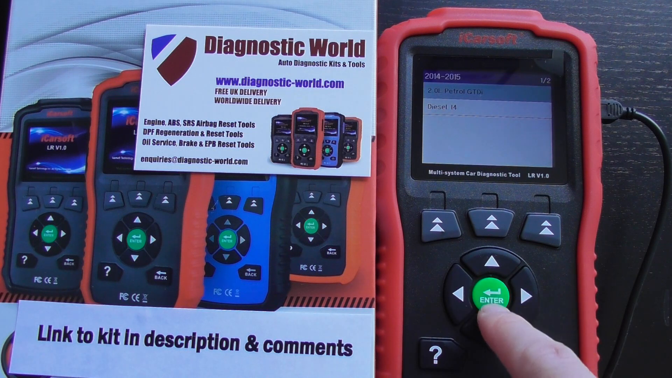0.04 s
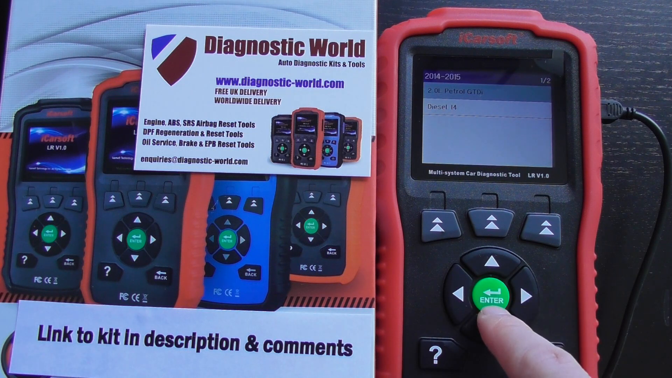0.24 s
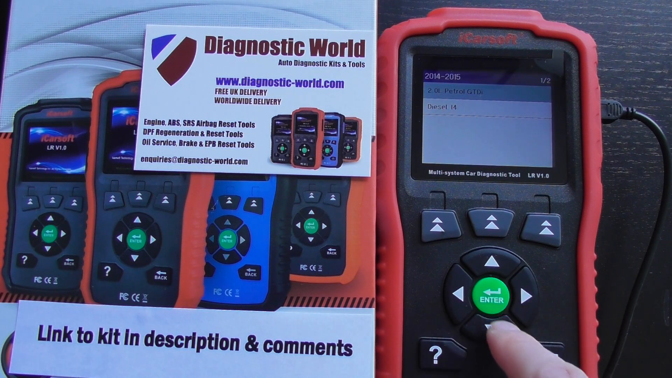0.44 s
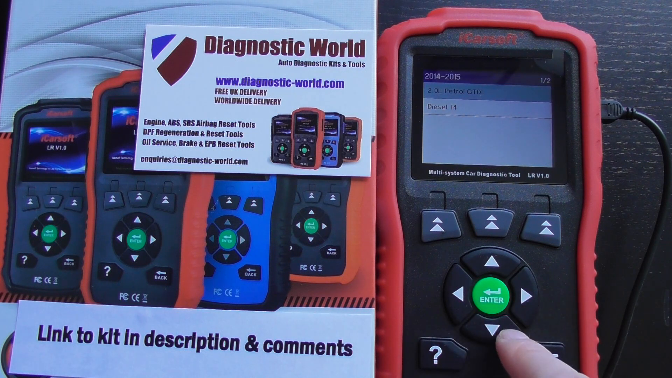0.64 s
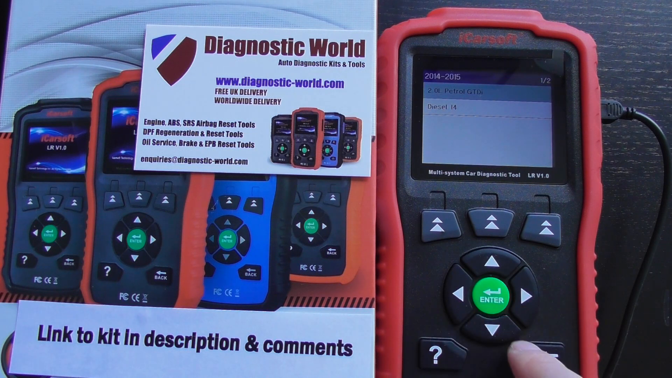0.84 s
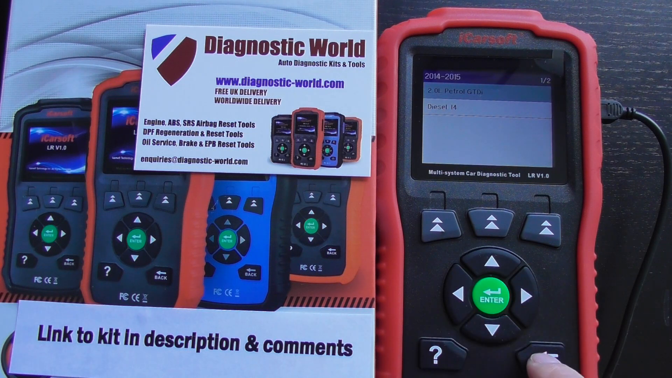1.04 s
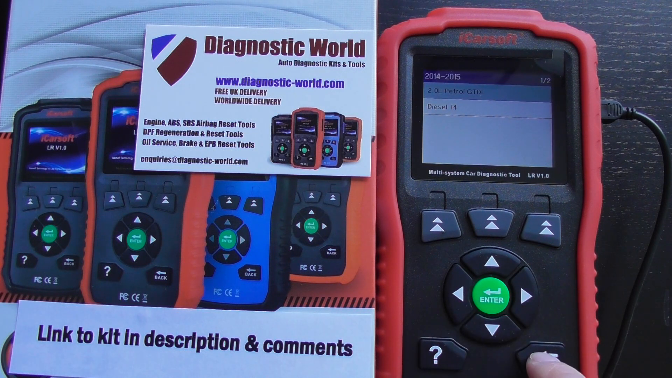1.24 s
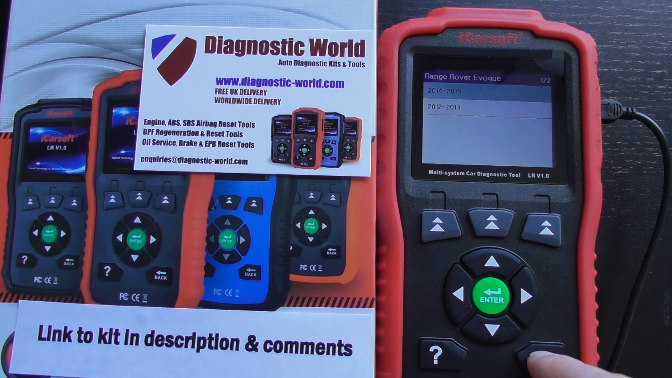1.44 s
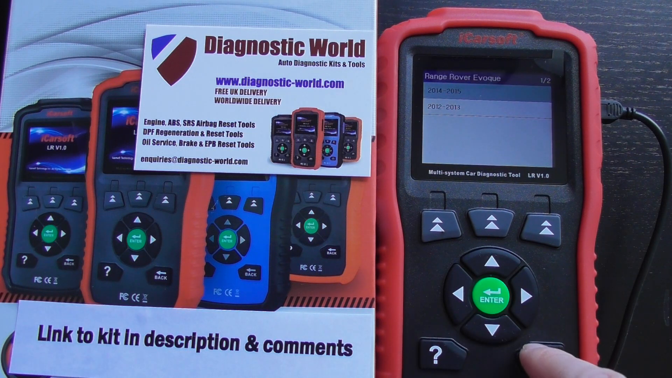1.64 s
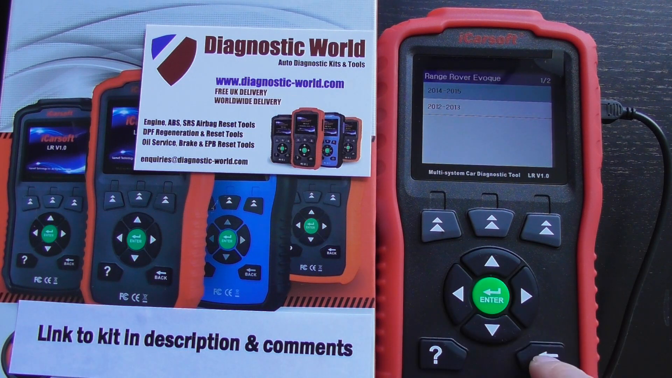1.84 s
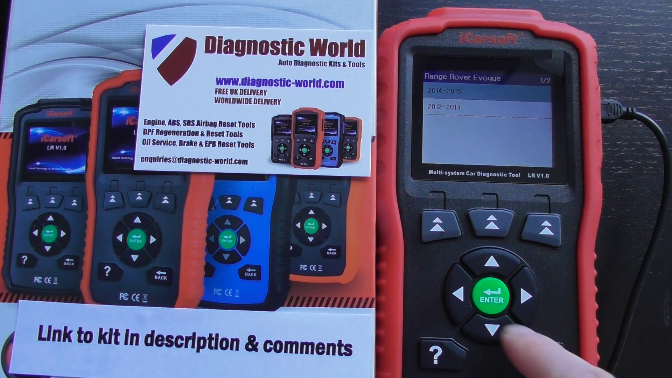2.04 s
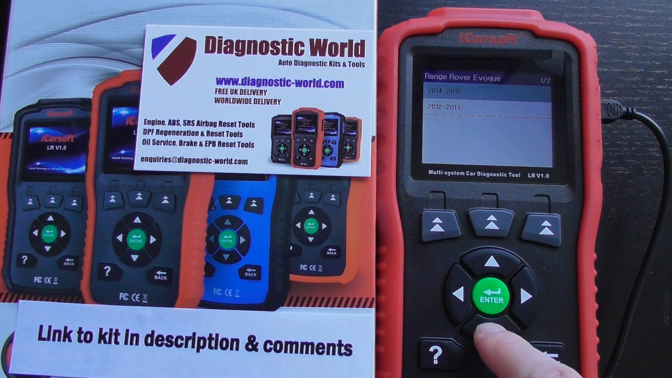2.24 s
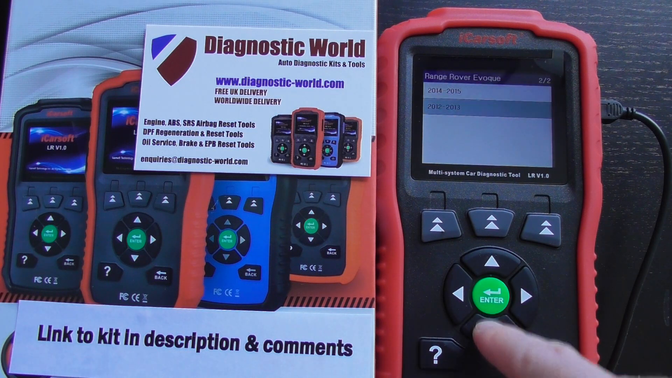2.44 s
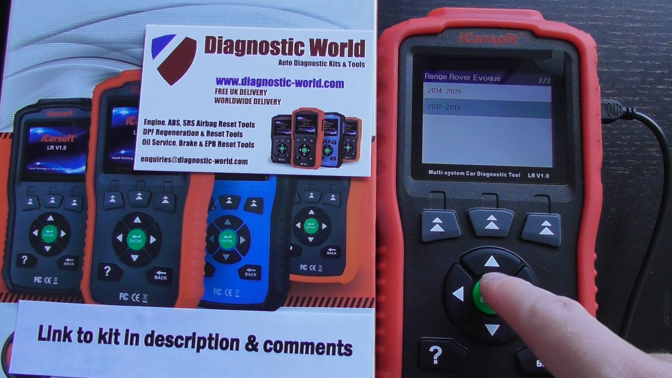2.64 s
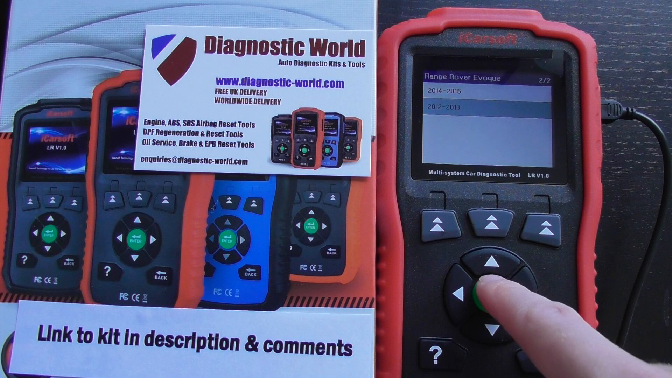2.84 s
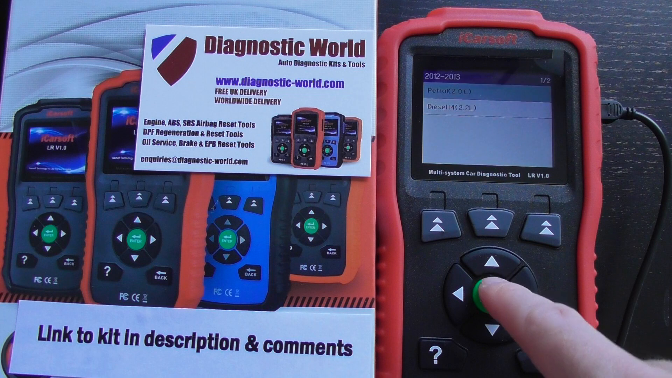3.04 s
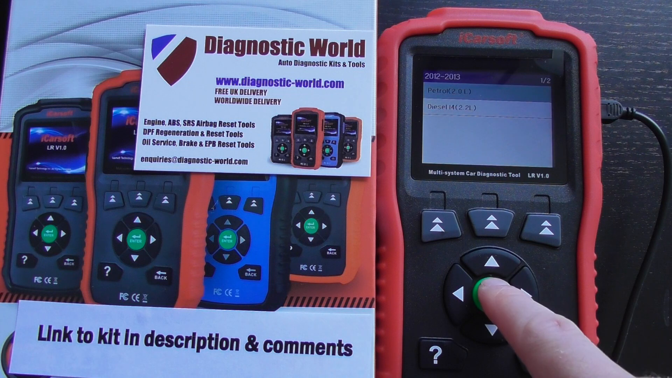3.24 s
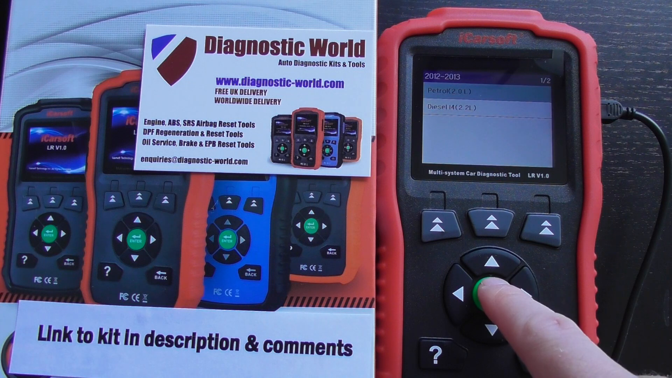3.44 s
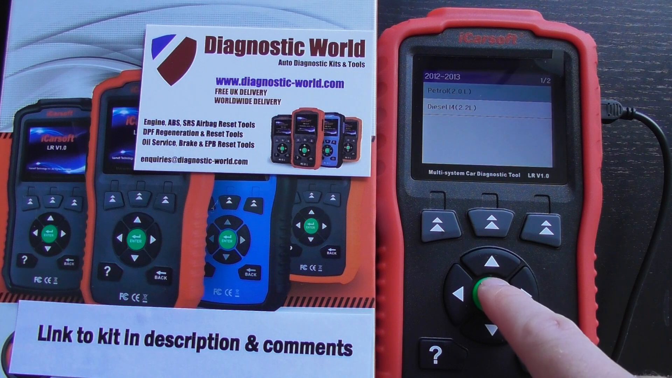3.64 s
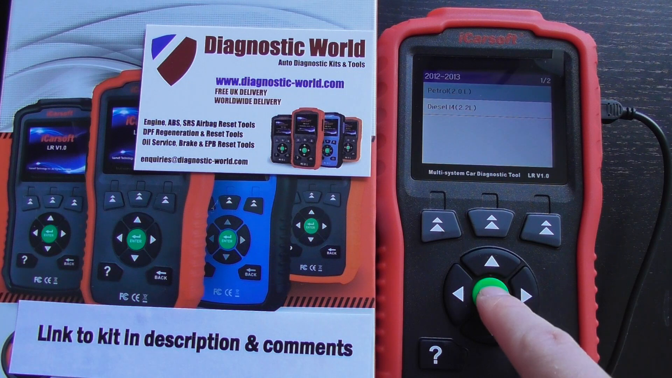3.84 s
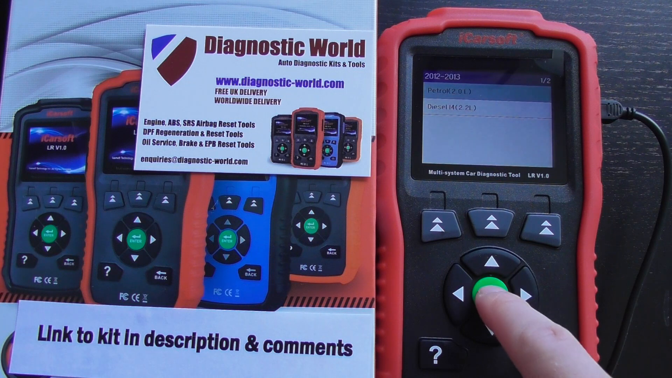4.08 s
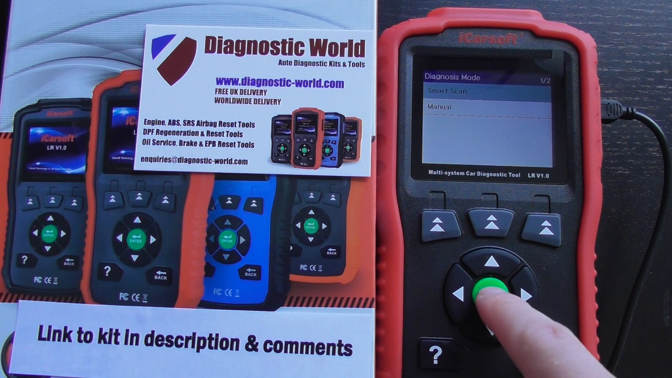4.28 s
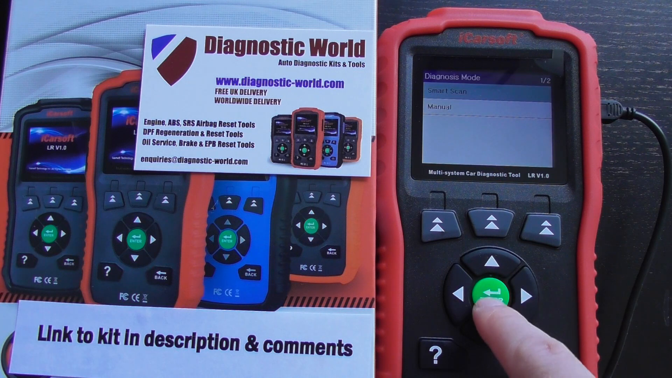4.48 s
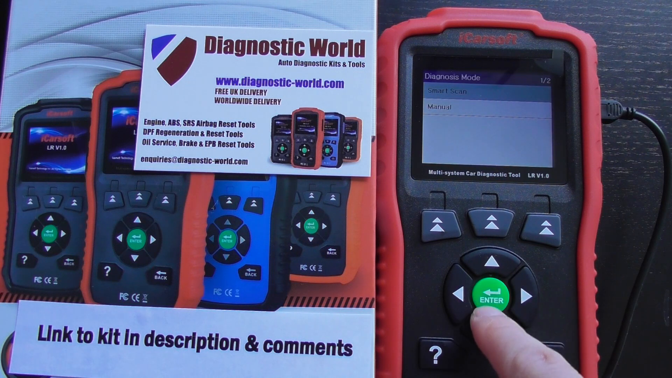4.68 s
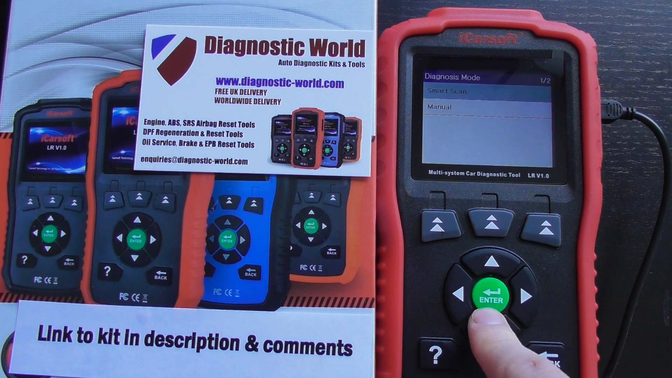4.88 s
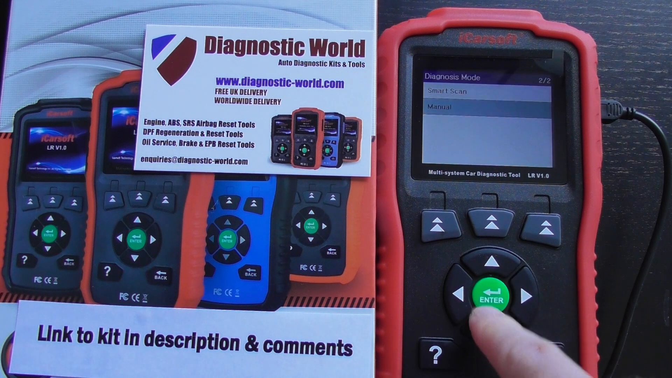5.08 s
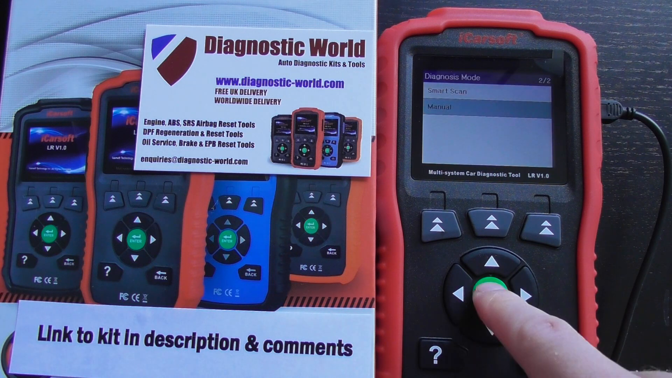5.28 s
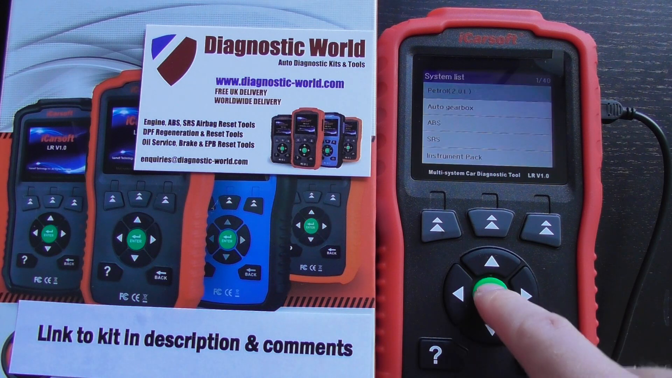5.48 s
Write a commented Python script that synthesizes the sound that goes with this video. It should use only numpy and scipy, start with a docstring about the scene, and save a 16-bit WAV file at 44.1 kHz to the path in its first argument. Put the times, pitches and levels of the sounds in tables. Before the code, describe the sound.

Plastic buttons on a handheld scanner click six times, each with a press and release snap, in a quiet room.

```python
"""A small quiet room rumbles, hums and hisses; a plastic handheld scanner buzzes faintly on a desk.
Just after one second a finger lands softly and works the back button, then arrow, then enter twice.
Each button's springy dome snaps going down and again coming up, knocking the hollow case and the desk.
Near five seconds come arrow and enter once more. Around the first arrow push, and again around these
last two pushes, the busy electronics sizzle faintly and a coil gives brief whines."""
import sys
import numpy as np
from scipy import signal
from scipy.fft import rfft, irfft, next_fast_len
from scipy.io import wavfile
from scipy.ndimage import uniform_filter1d, map_coordinates

SR = 44100
rng = np.random.default_rng(int(sys.argv[2]) if len(sys.argv) > 2 else 0)


def store_pcm(level_fs):
    """Save levels as 16-bit WAV."""
    pcm = np.round(np.clip(level_fs, -1, 1) * 32767).astype(np.int16)
    wavfile.write(sys.argv[1], SR, np.atleast_2d(pcm).T)


N = 243431
TIME = np.arange(N) / SR
FFT_SIZE = 2 ** 15
FREQ = np.fft.rfftfreq(FFT_SIZE, 1 / SR)

# each push of a button: press_s, release_s, button, force_db, cap_pitch_hz, brightness_db
PUSHES = [(1.3405, 1.4875, "back", -4, 965, -1), (2.3760, 2.4806, "arrow", -.5, 1000, 3),
          (2.8527, 2.975, "enter", 0, 775, -6.5), (4.0753, 4.2058, "enter", 0, 1060, -1.5),
          (4.9095, 5.0663, "arrow", -3, 878, -4.5), (5.3271, 5.4764, "enter", 0.8, 1080, -3)]
# the tone of each button's snap: pitch_hz, level_db
SNAP_TONES = {"back": [(300, -17.5), (1600, -31), (2100, -3), (2550, -23), (3300, 1.5), (4100, 0.5),
              (4800, -14.5), (5700, -15), (7300, 2.5), (8000, -1), (9800, -7), (12500, -11), (16000, -17)],
              "arrow": [(300, -39), (1000, -2), (2000, -0.5), (2600, -11), (3450, 0.5), (4300, -4.5),
              (5450, -10), (6200, -2), (7600, -0.5), (8700, -11), (9800, -5.5), (13000, -16.5),
              (16000, -29)], "enter": [(300, -38.5), (1100, 2), (1950, 2), (2250, -4.5), (2700, -13),
              (3200, 0.5), (4100, -0.5), (5200, -20), (6000, 1.5), (7300, 10), (8300, 6.5), (9100, -3.5),
              (10400, -2.5), (16000, -19.5)]}
# what sets each button apart: snap_db, cap_db, clack_db, finger_damped_hz
BUTTON_TRAITS = {"back": (-2, -2.3, -30, 1680), "arrow": (-2, -1.7, -0.5, 2116),
                 "enter": (0.6, -0.2, -19, 1341)}
# a button springing back is freer, and changes by: snap_db, cap_db, clack_db, brightness_db
RELEASE_CHANGES = {"back": (3, 7.5, 0, -4.5), "arrow": (2.5, 1, -7, 2.5), "enter": (.7, 2.1, .5, 3.5)}
# the notes at which dome, case and desk ring: pitch_hz, width_hz, level_db
DOME_NOTES = [(7290, 200, -1)]
CASE_NOTES = [(440, 40, 5), (503, 36, 19), (530, 12, 15), (563, 26, 23), (654, 36, 14), (706, 36, 16),
              (759, 14, 10), (845, 20, 11), (903, 18, 6), (1070, 36, 8)]
DESK_NOTES = [(143, 14, 10), (188, 12, 11), (229, 10, 7), (262, 16, 10), (290, 30, 13), (333, 32, 13)]
# buttons near the rim stir the lowest case notes less; for each button: low_cut_hz
CASE_LOW_HZ = {"back": 680, "arrow": 572, "enter": 370}
# the finger lands on a button or nudges the case: start_s, level_db, pitch_hz
TOUCHES = [(1.255, -56, 980), (1.646, -55.5, 500), (2.040, -51, 496), (2.289, -44.5, 434),
           (2.513, -40, 206), (2.767, -51, 380), (3.403, -59, 960), (5.156, -48, 234), (5.252, -44.5, 398)]
# echoes from near surfaces: delay_s, gain
ECHOES = [(.0053, 0.036), (0.0134, 0.014), (0.0171, 0.0081), (.0205, .02)]
# how long the room's tail takes to fall by 60 dB: pitch_hz, fade_s
TAIL_TIMES = [(150, 0.26), (500, 0.25), (2000, 0.28), (7000, 0.27), (14000, 0.2)]
# how strong that tail is: pitch_hz, level_db
TAIL_LEVELS = [(150, 0), (300, -9.5), (550, -11), (850, -12.5), (1200, -13), (2000, -13.5), (4000, -17),
               (7500, -19.5), (14000, -22.5)]
# how much louder the clicks and touches are on the left: pitch_hz, left_minus_right_db
LEFT_LOUDER = [(60, 8), (170, -5.5), (310, -6), (500, -5.5), (700, -2.5), (1300, 0.2), (6000, 0),
               (8000, -0.8), (9000, -5.5), (10800, -7.5), (13000, 2), (15000, 0)]
# how far their waves run ahead on the left: pitch_hz, lead_radians
LEFT_LEAD = [(150, 0.43), (500, 0.44), (900, 0.6), (1800, 0.18), (5000, -0.078), (9800, 0.21), (11500, 1.7),
             (15000, 1.4)]
# spells when the electronics are busy: start_s, end_s, level_db
BUSY_SPELLS = [(1.85, 2.42, -64.5), (2.42, 2.76, -68.8), (4.8, 5.14, -65.5), (5.21, 5.52, -67.5)]
# spells of coil whine: start_s
WHINE_STARTS = [2.5, 4.73, 5.155]
# the tone of the sizzle, the room rumble and the hiss: pitch_hz, relative_level_db
SIZZLE_TONE = [(5400, -32), (5800, -13.5), (6250, -24), (7000, -9), (7500, 0.5), (7900, -8), (8300, -12),
               (9000, -19), (10500, -42)]
RUMBLE_TONE = [(15, -41), (28, -16.5), (60, -9), (120, -9), (160, -9.5), (195, -1.5), (290, -7),
               (390, -13.5), (520, -12), (700, -17.5), (1350, -25.5), (1550, -30), (2020, -23.5),
               (2500, -42), (5000, -86)]
HISS_TONE = [(1500, -50), (2000, -6), (2800, -13), (3800, -8), (5000, -18), (6300, -11), (7500, 2),
             (8500, -4), (11000, -3.5), (15600, -3.5), (16100, -72)]
# the tones of the mains hum: pitch_hz, level_db
HUM_NOTES = [(50, -84.5), (100, -79.5), (196, -72.5)]
# how alike left and right noise are (1 is the same): pitch_hz, likeness
STEREO_LIKENESS = [(60, .1), (290, 0.067), (640, 0.04), (1410, 0.72), (3100, 0.96), (6820, 1), (15000, 0.1)]


def buttons(knock_delay_s=0.00052, desk_delay_s=0.0028, rebound_s=0.000529, rebound_gain=0.81,
            treble_hz=9000, cap_boost_db=8):
    """A button's dome snaps within a millisecond; its cap, the case and the desk ring just after."""
    out = np.zeros(N)
    # the rubber mount passes only the low part of the blow, and small panels give off little bass
    desk = ringing(DESK_NOTES) * passband(155, 480)
    cases = {name: ringing(CASE_NOTES) * passband(low_hz, 937) for name, low_hz in CASE_LOW_HZ.items()}
    clack = resonance(hz=1600, width_hz=520) ** 2
    # the dome takes a few cycles to buckle, which spreads the highest tones in time
    buckle = 1 - 2 * resonance(hz=9500, width_hz=4000)
    treble = FREQ ** 4 / (FREQ ** 4 + treble_hz ** 4)
    for (start_s, direction, button, snap_db, knock_db, thump_db,
         cap_db, cap_hz, clack_db, damped_hz, bright_db) in strokes():
        tone = causal(along(SNAP_TONES[button], FREQ) + bright_db * treble)
        snap = amp(snap_db) * buckle * (tone + ringing(DOME_NOTES))
        # the plastic stem bounces once with a thin tick
        snap *= 1 + rebound_gain * treble * delay(rebound_s * (.5 + rng.random()))
        # the finger's load sets the pitch of the cap and damps one band of tones
        cap = amp(cap_db + cap_boost_db) * resonance(cap_hz, width_hz=380) ** 2
        finger = 1 - resonance(damped_hz, width_hz=225)
        # the desk pushes back against the case a few milliseconds later
        thump = amp(thump_db) * desk * delay(desk_delay_s)
        body = amp(knock_db) * cases[button] - thump + cap + amp(clack_db) * clack
        click = irfft(finger * (snap + body * delay(knock_delay_s)))[:FFT_SIZE // 2]
        add(out, start_s, room(direction * click))
    return out


def strokes(release_knock_db=1.5):
    """Each push gives two clicks: the press, then a release that kicks the case harder the other way."""
    for press_s, release_s, button, force_db, cap_hz, bright_db in PUSHES:
        snap_db, cap_db, clack_db, damped_hz = BUTTON_TRAITS[button]
        more_snap_db, more_cap_db, more_clack_db, more_bright_db = RELEASE_CHANGES[button]
        thump_db = -1.5 + 1.9 * force_db  # the desk's thump grows faster than the force
        clack_db += force_db
        yield (press_s, 1, button, snap_db, force_db, thump_db,
               cap_db, cap_hz, clack_db, damped_hz, bright_db)
        yield (release_s, -1, button, snap_db + more_snap_db, force_db + release_knock_db, thump_db,
               cap_db + more_cap_db, cap_hz, clack_db + more_clack_db, damped_hz,
               bright_db + more_bright_db)


def touches(rise_s=0.001, fade_s=0.06, typical_hz=450, spread=.3):
    """The soft fingertip makes a dull bump: five close tones that die away quickly."""
    out = np.zeros(N)
    t = TIME[:SR // 4]
    for start_s, level_db, hz in TOUCHES:
        pitches = hz * np.exp(spread * np.linspace(-1, 1, num=5) + 0.076 * rng.standard_normal(5))
        tones = np.sin(2 * np.pi * (pitches[:, None] * t + rng.random((5, 1))))
        age = t * (hz / typical_hz) ** .7  # lower bumps swell and die more slowly
        loudness = amp(level_db - 60 * age / fade_s) * (1 - np.exp(-age / rise_s)) ** 2
        add(out, start_s, room(unit(tones.sum(axis=0)) * loudness))
    return out


def room(dry, build_s=0.00075):
    """Near surfaces send back single echoes, and the room adds a short, blurred tail."""
    hz, t, tail_noise = signal.stft(rng.standard_normal(SR // 2), SR, nperseg=256)
    fade = amp(-60 * t / along(TAIL_TIMES, hz)[:, None]) * (1 - np.exp(-t / build_s))
    energy = np.mean(fade ** 2, axis=1, keepdims=True) * SR / 2
    fade *= amp(along(TAIL_LEVELS, hz))[:, None] / np.sqrt(energy)
    response = signal.istft(tail_noise * fade, SR, nperseg=256)[1]
    response[0] = 1  # the sound that arrives directly
    for delay_s, gain in ECHOES:
        response[round(delay_s * SR)] += gain
    return signal.fftconvolve(dry, response)


def sizzle(busy_hz=153.0, idle_hz=50.2, idle_db=-78):
    """Busy circuits buzz faster and louder than idle ones, half buried in their own fizz."""
    busy = amp(-5) * buzz(busy_hz) + amp(-3) * noise(SIZZLE_TONE)
    return switched(BUSY_SPELLS) * busy + amp(idle_db) * buzz(idle_hz)


def buzz(hz):
    """Circuits repeat a pattern of tiny spikes, hz times a second."""
    pattern = rng.standard_normal(SR // 10)[:round(SR / hz)]
    return unit(filtered(np.resize(pattern, N), lambda f: amp(along(SIZZLE_TONE, f))))


def coil_whine(pitch_hz=5800, length_s=0.063, level_db=-75):
    """A coil sings one thin, high note in short spells."""
    spells = [(start_s, start_s + length_s, level_db) for start_s in WHINE_STARTS]
    return switched(spells) * unit(np.sin(2 * np.pi * pitch_hz * TIME))


def mains_hum(waver_db=2):
    """Mains power hums in low tones that waver a little in level and pitch."""
    hum = np.zeros(N)
    for hz, level_db in HUM_NOTES:
        loudness = amp(level_db + waver_db * wobble(4.1))
        drift = 0.68 * hz / 100 * wobble(2.386)
        hum += loudness * unit(np.sin(2 * np.pi * hz * TIME + drift))
    return hum


def background(rumble_db=-64.5, hiss_db=-71):
    """The room's hum and rumble, a little louder on the right, and steady microphone hiss."""
    low_sounds = mains_hum() + amp(rumble_db) * noise(RUMBLE_TONE)
    return low_sounds * amp([[-.8], [.8]]) + amp(hiss_db) * noise(HISS_TONE)


def noise(tone):
    """Stereo noise with the given tone, at an average (rms) level of 1."""
    def shape(hz):
        angle = np.arccos(np.clip(along(STEREO_LIKENESS, hz), -1, 1)) / 2
        return amp(along(tone, hz)) * [np.cos(angle), np.sin(angle)]
    shared, opposite = filtered(rng.standard_normal((2, N)), shape)
    return unit(np.array([shared + opposite, shared - opposite]))


def resonance(hz, width_hz):
    """A filter for one ringing note, 1 at its peak; a wider note dies sooner."""
    return 1j * FREQ * width_hz / (hz ** 2 - FREQ ** 2 + 1j * FREQ * width_hz)


def ringing(notes):
    """A filter for several notes struck together."""
    return sum(amp(db) * resonance(hz, width_hz) for hz, width_hz, db in notes)


def passband(low_hz, high_hz):
    """A filter that keeps one band and falls 18 dB an octave on both sides."""
    return causal(-10 * np.log10((1 + (low_hz / (FREQ + 1)) ** 6) * (1 + (FREQ / high_hz) ** 6)))


def causal(db):
    """The sharpest filter with these levels that makes no sound before it is struck."""
    cepstrum = irfft(np.log(amp(db)))
    cepstrum[1:FFT_SIZE // 2] *= 2
    cepstrum[FFT_SIZE // 2 + 1:] = 0
    return np.exp(rfft(cepstrum))


def delay(seconds):
    """A filter that makes a sound arrive later."""
    return np.exp(-2j * np.pi * FREQ * seconds)


def filtered(x, response):
    """Reshape x by a gain that depends on pitch."""
    size = next_fast_len(x.shape[-1] + SR // 2)
    return irfft(rfft(x, size) * response(np.fft.rfftfreq(size, 1 / SR)), size)[..., :x.shape[-1]]


def switched(spells):
    """A gain that turns smoothly on and off for each spell: start_s, end_s, level_db."""
    steps = sum(amp(db) * ((TIME > start_s) & (TIME < end_s)) for start_s, end_s, db in spells)
    return uniform_filter1d(steps, size=300)


def wobble(rate_hz):
    """A smooth curve through rate_hz random points a second."""
    return map_coordinates(rng.standard_normal(int(N * rate_hz / SR) + 4), [TIME * rate_hz])


def along(points, hz):
    """Read between a table's rows (pitch_hz, value), with octaves evenly spaced."""
    pitches, values = np.transpose(points)
    return np.interp(np.log(hz + 1), np.log(pitches), values)


def add(track, start_s, sound):
    """Mix a sound into a track at a given time."""
    start = round(start_s * SR)
    track[start:start + len(sound)] += sound[:N - start]


def amp(db):
    """Turn decibels into a gain."""
    return 10 ** (np.asarray(db) / 20)


def unit(x):
    """Scale to an average (rms) level of 1."""
    return x / np.sqrt(np.mean(x ** 2) + 1e-20)


def scene():
    """Clicks and touches reach left and right with unequal level and timing, over the quiet sounds."""
    sides = np.array([[.5], [-.5]])
    stereo = lambda hz: amp(sides * along(LEFT_LOUDER, hz)) * np.exp(1j * sides * along(LEFT_LEAD, hz))
    return filtered(buttons() + touches(), stereo) + background() + sizzle() + coil_whine()


def record(dry, top_hz=16300):
    """The very highest treble is cut away, fading out around top_hz."""
    return filtered(dry, lambda hz: np.clip((top_hz - hz) / 600 + .5, 0, 1))


dry = scene()
out = record(dry)
store_pcm(out)
```